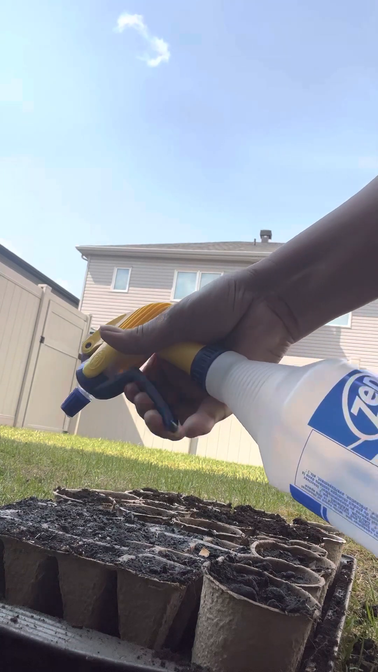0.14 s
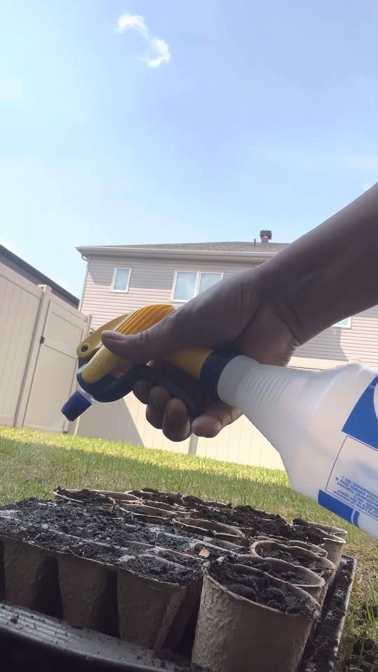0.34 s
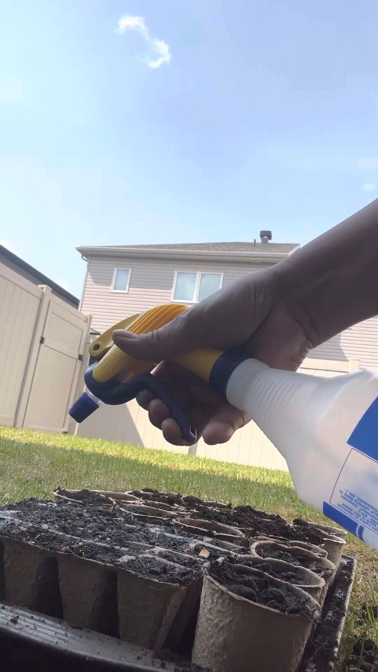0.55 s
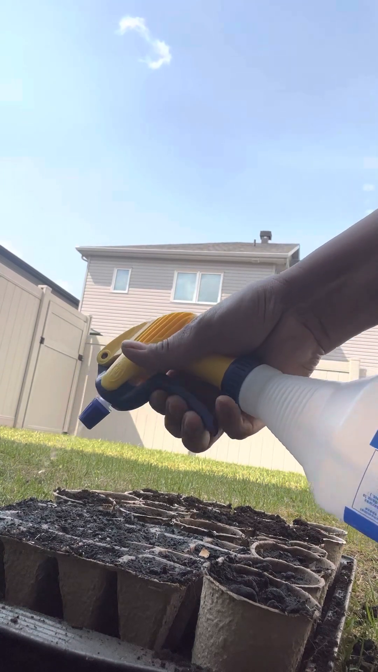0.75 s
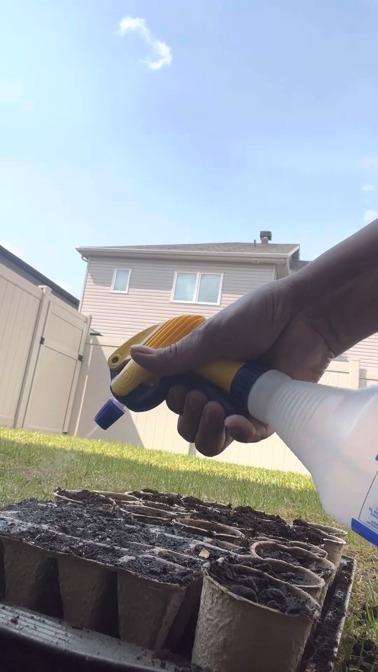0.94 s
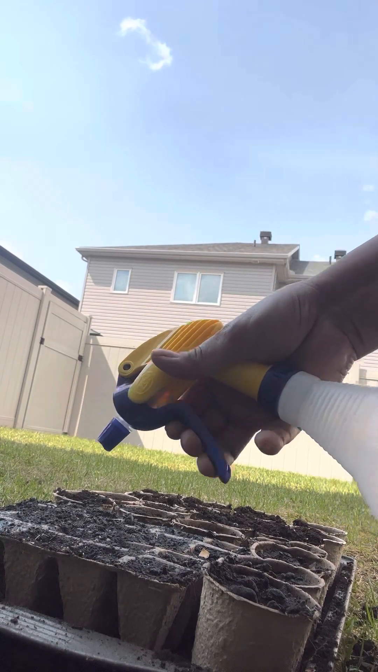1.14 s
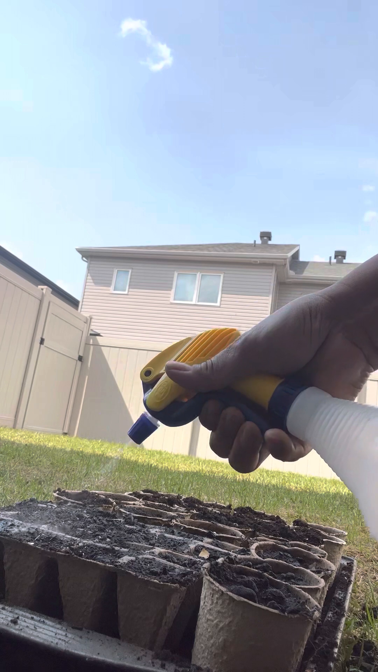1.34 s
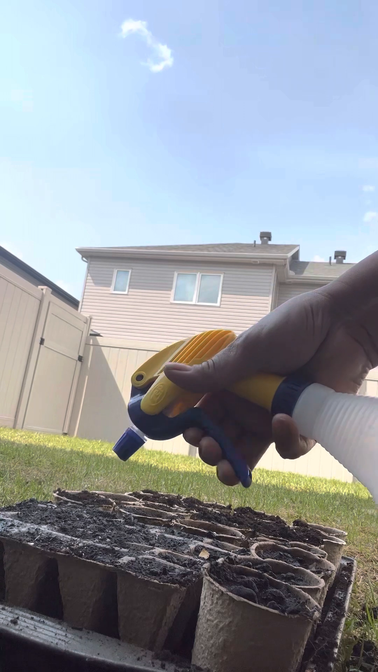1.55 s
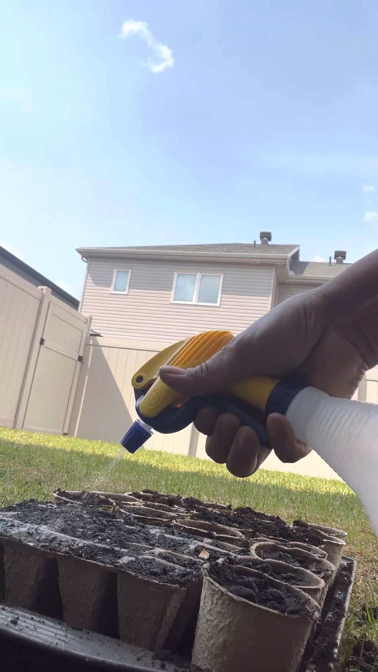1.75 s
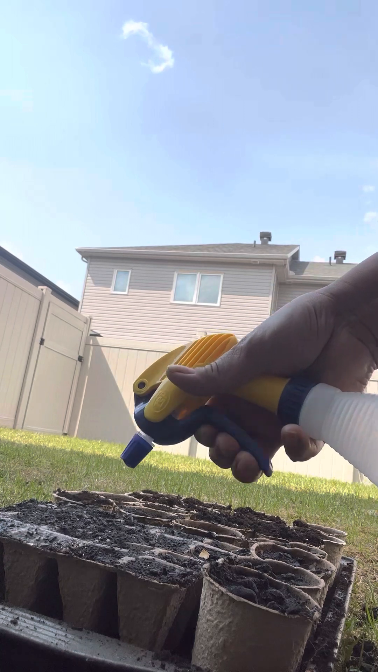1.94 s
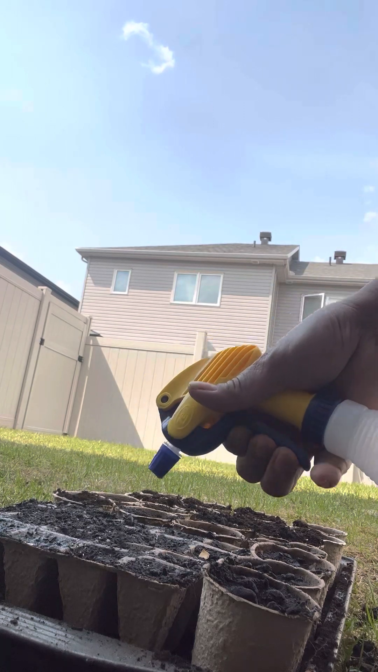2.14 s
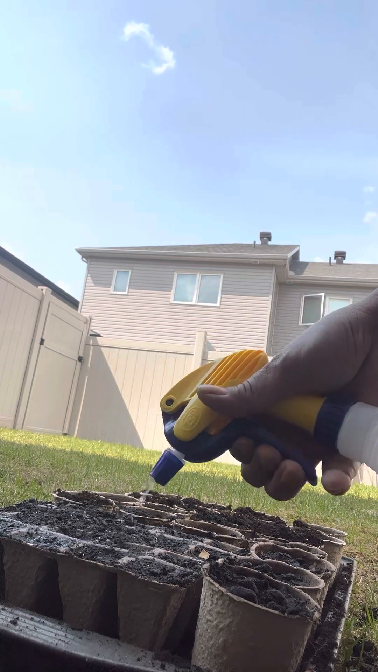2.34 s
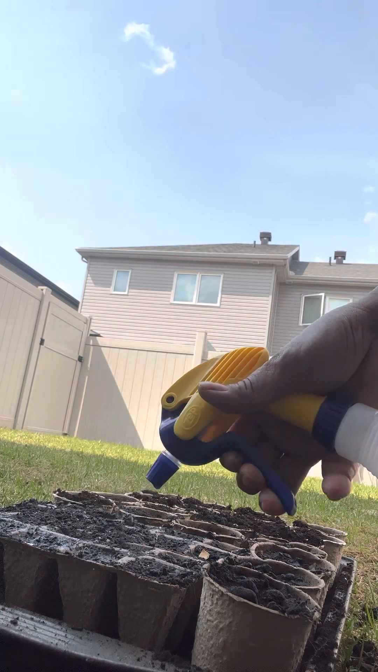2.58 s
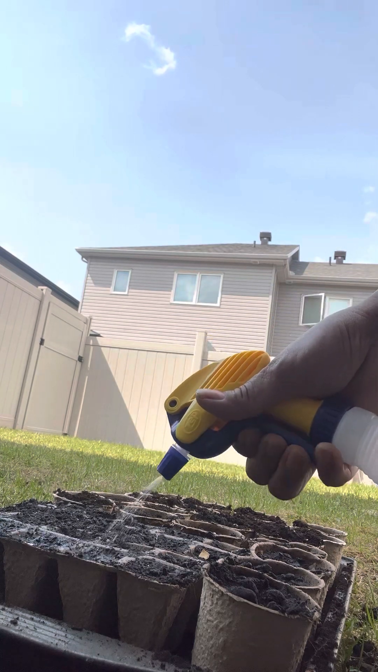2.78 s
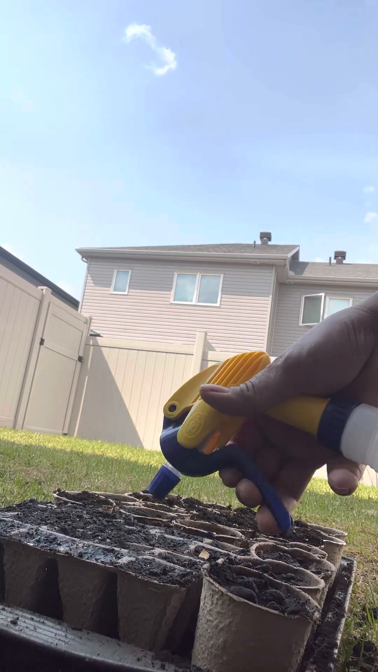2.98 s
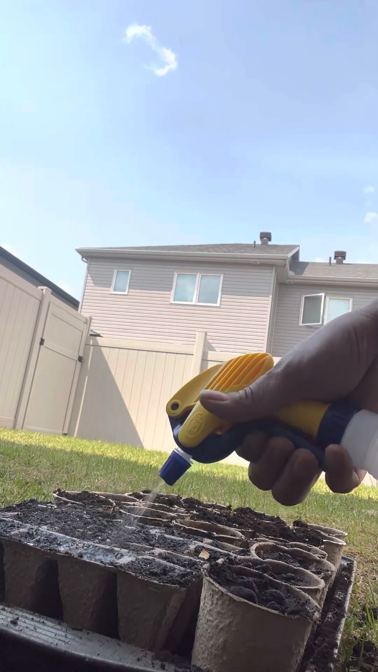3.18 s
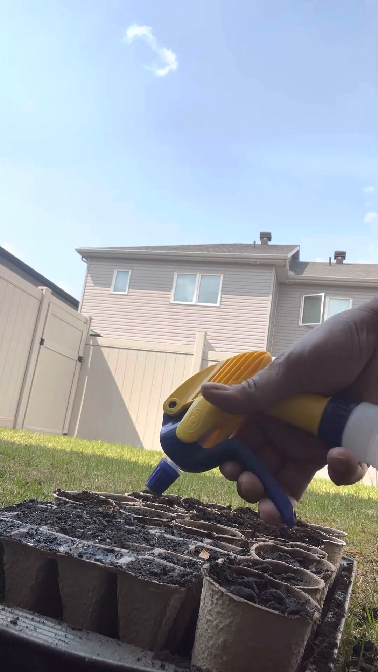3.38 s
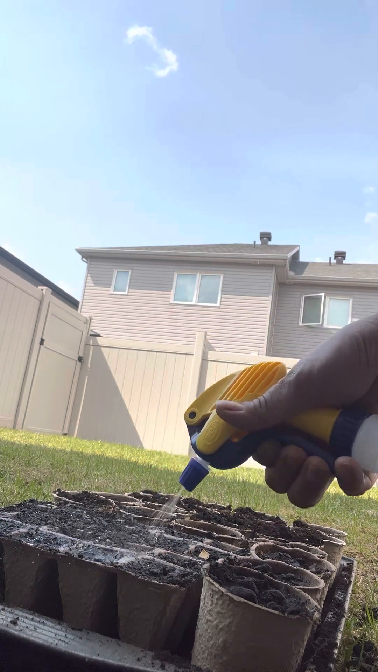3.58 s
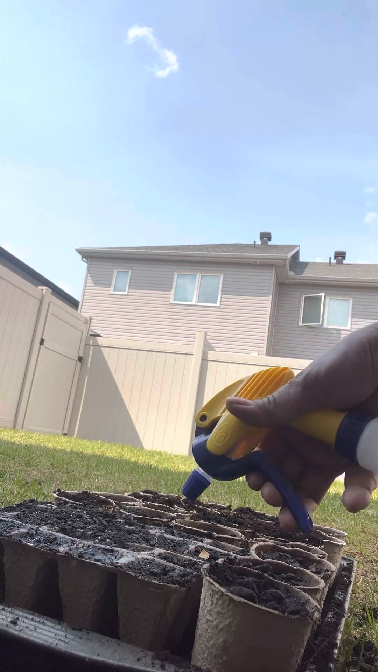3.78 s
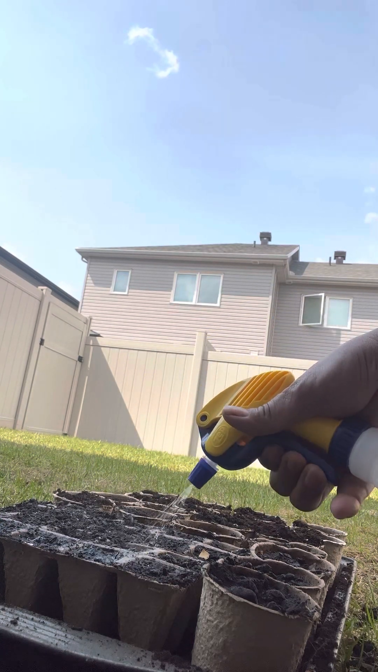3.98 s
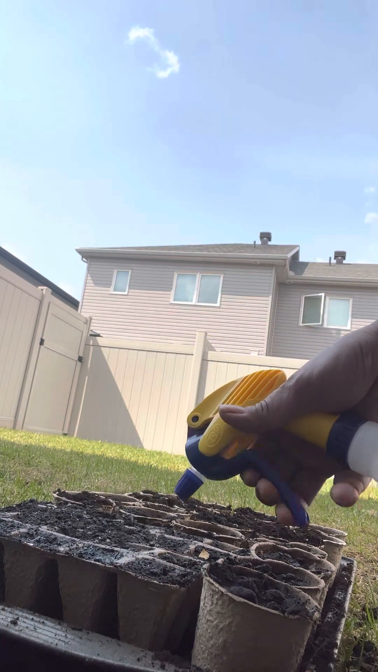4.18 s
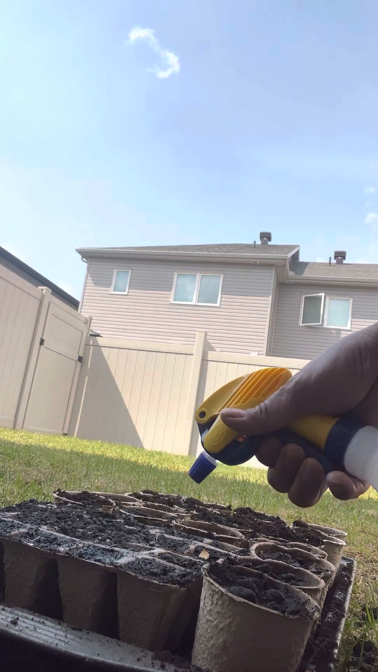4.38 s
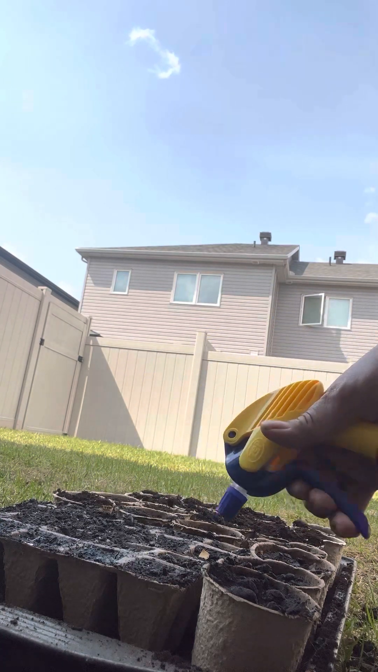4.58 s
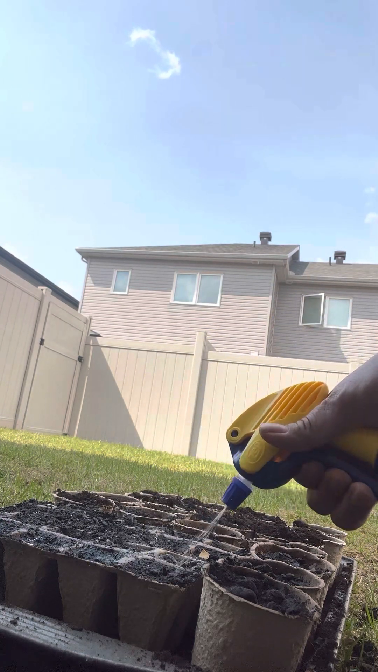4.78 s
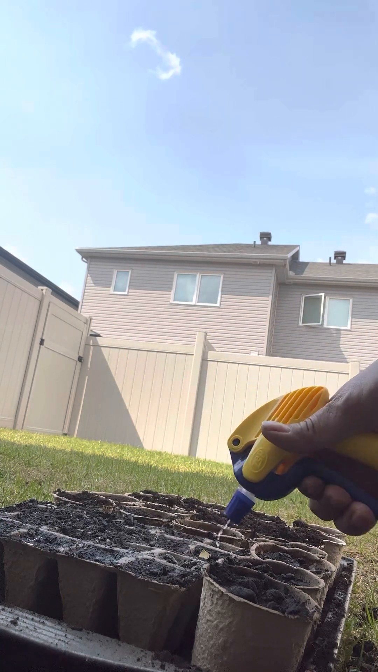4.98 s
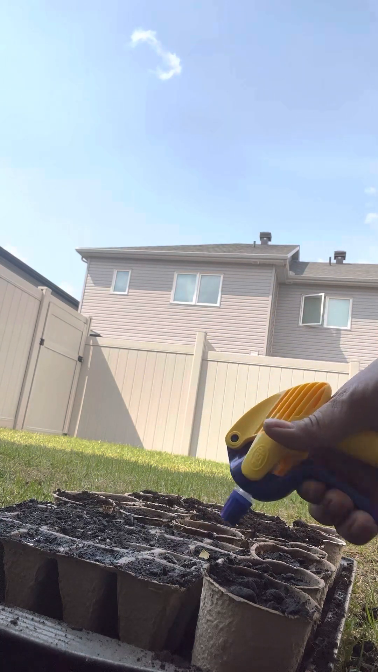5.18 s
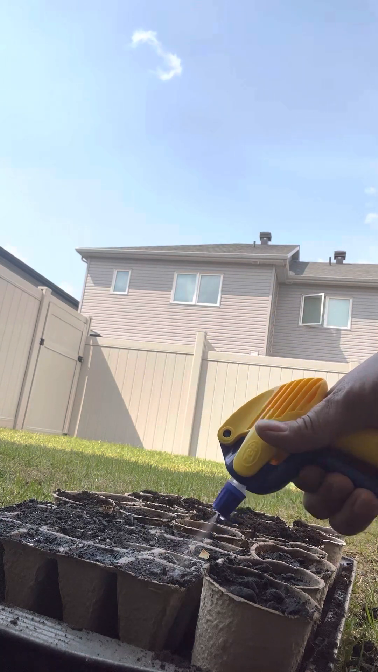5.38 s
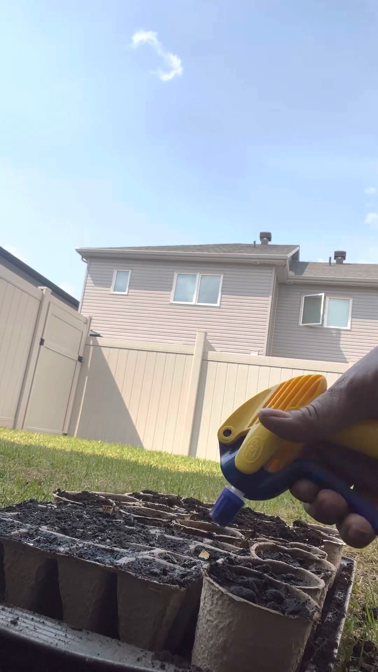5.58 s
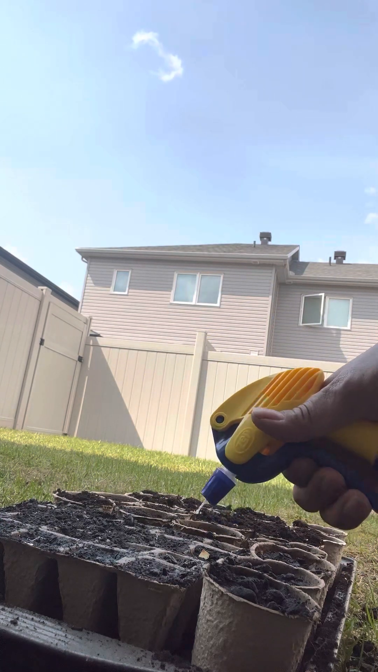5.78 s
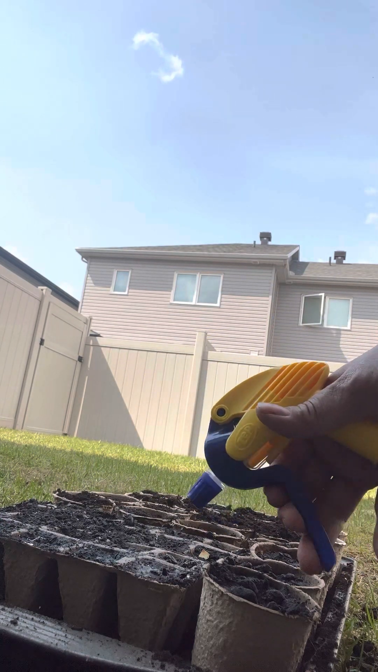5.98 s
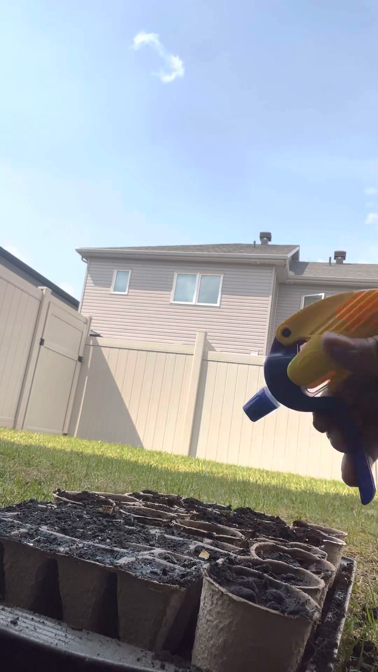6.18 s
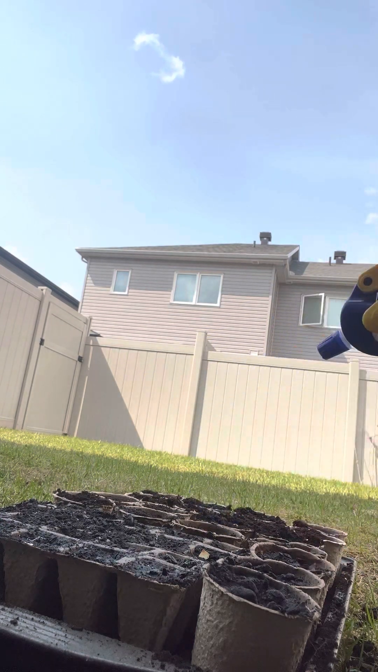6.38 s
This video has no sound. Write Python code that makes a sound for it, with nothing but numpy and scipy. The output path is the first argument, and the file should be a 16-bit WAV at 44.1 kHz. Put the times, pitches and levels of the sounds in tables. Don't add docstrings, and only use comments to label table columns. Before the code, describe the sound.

Close, dry spritzing over peat pots outdoors: crisp hissing spurts in an uneven but steady rhythm, with wheezy pump refills between them. Hollow plastic clicks, brief metallic pings and little rubbery chirps mark some releases. The last squeezes come with a hard low knock, then the spraying stops and leaves a quiet yard hum, faint leaves and soft wind rumble on a handheld phone.

```python
import sys
import numpy as np
from scipy import signal
from scipy.fft import rfft, irfft, next_fast_len
from scipy.io import wavfile
from scipy.ndimage import uniform_filter1d, map_coordinates

SR = 44100
rng = np.random.default_rng(int(sys.argv[2]) if len(sys.argv) > 2 else 0)


def to_linear_factor(level_db):
    exponent = np.asarray(level_db, float) / 20
    return 10 ** exponent


def transcribe(u):
    v = np.clip(np.atleast_2d(u).T, -1, 1)
    q = np.round(v * 32767).astype(np.int16)
    wavfile.write(sys.argv[1], SR, q)


N = 283563

# start in seconds, nozzle hiss in dB, pump body over the hiss
# in dB, rise in seconds, hold in seconds, time to fall 60 dB in seconds.
SPURTS = [(0, -35.5, -3.5, 0.00066, 0.022, 0.064), (0.1357, -53, 9.5, 0.0077, 0, 0.021),
          (0.136, -51.5, 10.5, 0.016, 0.057, 0.12), (0.183, -35.5, -11, 0.0011, 0, 0.04),
          (0.196, -43.5, -1, 0.0068, 0.032, 0.05), (0.2606, -57, 8, 0.0062, 0.006, 0.03),
          (0.316, -47, -7, 0.0096, 0.076, 0.2), (0.35, -44.5, 0, 0.052, 0.078, 0.2),
          (0.408, -34, -9, 0.0033, 0.011, 0.11), (0.483, -36, -5, 0.0048, 0.037, 0.078),
          (0.551, -48, -5, 0.0045, 0.016, 0.082), (0.5776, -51.5, 7.5, 0.009, 0.032, 0.15),
          (0.6896, -43.5, 2, 0.00078, 0, 0.02), (0.734, -61, 12, 0.008, 0.016, 0.012),
          (0.7404, -40.5, -8, 0.008, 0, 0.19), (0.788, -44.5, -2.5, 0.0063, 0.045, 0.121),
          (0.831, -32, -3.5, 0.0079, 0.01, 0.031), (0.84, -36.5, -5.5, 0.048, 0.093, 0.16),
          (1.011, -56, 12.5, 0.013, 0.058, 0.11), (1.1395, -59.5, 5, 0.002, 0, 0.13),
          (1.1448, -29.5, -5.5, 0.0055, 0.00075, 0.016), (1.1927, -58.5, 13, 0.003, 0.0078, 0.027),
          (1.1929, -41.5, -4.5, 0.0066, 0.015, 0.23), (1.2356, -32.5, -7, 0.043, 0.097, 0.091),
          (1.3703, -37.5, -1.5, 0.0074, 0.013, 0.051), (1.4363, -56, 7.5, 0.01, 0.005, 0.034),
          (1.4502, -53, 6.5, 0.015, 0.036, 0.046), (1.51, -78, 7, 0.0071, 0.013, 0.2),
          (1.5426, -44, 0.5, 0.001, 0, 0.028), (1.5937, -48.5, -7, 0.015, 0.054, 0.04),
          (1.656, -43.5, -1, 0.0089, 0.0067, 0.018), (1.6605, -31.5, -5.5, 0.033, 0.02, 0.22),
          (1.827, -47, -10, 0.001, 0.00056, 0.04), (1.8274, -52, 7, 0.01, 0.027, 0.16),
          (1.8967, -41.5, 0, 0.0097, 0.0054, 0.012), (1.963, -34, -3.5, 0.053, 0.029, 0.12),
          (1.966, -57, 8, 0.008, 0.002, 0.03), (1.9835, -38, -1.5, 0.0033, 0.0066, 0.012),
          (2.1755, -51.5, 7, 0.005, 0, 0.049), (2.188, -47.5, 4.5, 0.0075, 0.064, 0.11),
          (2.238, -54, 14.5, 0.004, 0.013, 0.06), (2.3083, -42, 1, 0.0084, 0.0033, 0.029),
          (2.3492, -64, 2, 0.008, 0.0054, 0.012), (2.3628, -41.5, -12, 0.005, 0.0058, 0.03),
          (2.3654, -39, -4, 0.046, 0.055, 0.19), (2.416, -30.5, -6.5, 0.012, 0.0084, 0.082),
          (2.4877, -33, -5, 0.0062, 0.039, 0.032), (2.563, -53.5, 7.5, 0.016, 0.042, 0.1),
          (2.611, -40, 4, 0.001, 0.0015, 0.044), (2.655, -83, 30, 0.0054, 0, 0.045),
          (2.663, -60.5, 10.5, 0.0045, 0, 0.15), (2.6991, -42.5, 3.5, 0.0012, 0.00053, 0.019),
          (2.715, -71.5, 18, 0.0052, 0.0047, 0.018), (2.728, -40.5, -13, 0.0065, 0.0097, 0.09),
          (2.759, -58, -2, 0.0082, 0.071, 0.012), (2.813, -48, -4, 0.037, 0.015, 0.121),
          (2.8743, -36.5, -7, 0.0038, 0.026, 0.054), (2.921, -54.5, 5.5, 0.0093, 0.074, 0.08),
          (3.0385, -50, 4, 0.001, 0.0012, 0.024), (3.081, -43, -9.5, 0.024, 0.017, 0.101),
          (3.083, -78, 31.5, 0.0077, 0, 0.017), (3.1304, -30.5, -5.5, 0.049, 0.03, 0.22),
          (3.2125, -40, -2.5, 0.0056, 0.047, 0.017), (3.3146, -43.5, -18, 0.002, 0.0016, 0.02),
          (3.3278, -43.5, 4, 0.0046, 0, 0.032), (3.329, -50, 5.5, 0.026, 0.025, 0.1),
          (3.429, -65, 4, 0.008, 0.013, 0.101), (3.4376, -32.5, 1.5, 0.00081, 0, 0.028),
          (3.4765, -44, -3.5, 0.0095, 0.0086, 0.12), (3.5126, -38.5, -4, 0.054, 0.055, 0.21),
          (3.544, -35.5, -6, 0.008, 0.048, 0.018), (3.6465, -37, -4.5, 0.0034, 0.013, 0.058),
          (3.695, -52.5, 8, 0.015, 0.038, 0.12), (3.806, -48.5, 7, 0.0016, 0, 0.02),
          (3.8493, -70, 25, 0.001, 0, 0.021), (3.852, -47.5, -8.5, 0.008, 0.019, 0.16),
          (3.891, -30, -7, 0.045, 0.018, 0.18), (4.0162, -35.5, -8.5, 0.005, 0.019, 0.14),
          (4.0801, -60.5, 13.5, 0.007, 0, 0.19), (4.133, -55.5, 2, 0.001, 0.00055, 0.04),
          (4.1694, -57, 7.5, 0.002, 0, 0.021), (4.238, -75.5, 20, 0.0057, 0.018, 0.012),
          (4.244, -32.5, -4, 0.049, 0.054, 0.079), (4.2613, -31, -6, 0.00078, 0, 0.025),
          (4.4484, -51.5, 6.5, 0.0089, 0.048, 0.11), (4.5762, -59, 7, 0.0075, 0.0051, 0.027),
          (4.618, -64.5, 17, 0.0068, 0.0015, 0.018), (4.632, -44.5, -8, 0.0024, 0.0063, 0.11),
          (4.6644, -49.5, -1.5, 0.007, 0.0026, 0.2), (4.669, -31, -8.5, 0.036, 0.01, 0.17),
          (4.689, -31, -5.5, 0.0053, 0, 0.022), (4.76, -37, -6, 0.009, 0.047, 0.051),
          (4.848, -53, 7.5, 0.004, 0.0084, 0.13), (4.9232, -51, 0, 0.0022, 0, 0.017),
          (4.979, -32, -5, 0.05, 0.047, 0.094), (5.1802, -50.5, 6, 0.0048, 0, 0.22),
          (5.288, -54.5, 3, 0.002, 0, 0.033), (5.295, -27.5, -3, 0.0038, 0, 0.018),
          (5.3415, -34, -1.5, 0.036, 0.038, 0.072), (5.352, -34.5, -8, 0.005, 0.024, 0.081),
          (5.4875, -53.5, 11.5, 0.0014, 0, 0.028), (5.563, -50.5, 8, 0.015, 0.054, 0.13),
          (5.6576, -74.5, 16, 0.008, 0.029, 0.19), (5.7234, -45, 2, 0.002, 0, 0.02),
          (5.735, -65.5, 19.5, 0.007, 0, 0.123), (5.78, -48.5, -11, 0.018, 0.033, 0.14),
          (5.9405, -53.5, 5, 0.0045, 0.022, 0.081), (5.969, -55, 7.5, 0.004, 0.0053, 0.15)]
# frequency in Hz, level in dB per Hz.
HISS_SPECTRUM = [(5000, -67), (7000, -2), (9000, -6), (11000, -6), (12800, 2.5), (15000, 2.5), (15800, -3),
                 (16300, -40), (17000, -36)]
# frequency in Hz, level in dB per Hz.
BODY_SPECTRUM = [(150, -40), (300, -13), (600, -9.5), (1000, -11.5), (1500, -13), (2300, -8), (3300, -3.5),
                 (4800, -7), (7000, -1.5), (9000, -10.5), (12000, -49.5)]
# centre in Hz, width in Hz, level in dB.
CHAMBER_MODES = [(2140, 330, -11), (3430, 885, 1.5), (4400, 750, -4), (5810, 750, 2)]
# start in seconds, peak in dB, pitch in Hz, 60 dB decay in seconds.
KNOCKS = [
    (0.185, -27.5, 569, 0.043),
    (1.15, -38, 530, 0.055),
    (2.211, -37, 597, 0.05),
    (3.44, -40, 587, 0.05),
    (5.297, -52, 550, 0.05),
    (5.49, -24, 467, 0.028),
    (5.946, -43, 624, 0.042),
]
# start in seconds, pitch in Hz, level in dB, 60 dB decay in seconds.
PINGS = [(.222, 2467, -32, 0.13), (2.248, 4050, -34, 0.11), (2.25, 6083, -36, 0.067),
         (3.001, 4070, -52, 0.13), (4.5, 4350, -36, .05), (4.89, 4070, -57, 0.12), (5.618, 4115, -40, 0.11),
         (5.62, 6745, -44, .06), (5.745, 4075, -43, .14), (5.975, 4300, -42.5, 0.065),
         (5.975, 7050, -51, 0.072)]
# start in seconds, pitch in Hz, width in Hz, level in dB, length in seconds.
SQUEAKS = [
    (.215, 2460, 90, -43, 0.042),
    (2.22, 4550, 200, -43, .025),
    (2.242, 4400, 450, -38, 0.024),
    (2.605, 4500, 301, -48.5, .02),
    (5.607, 4150, 300, -41, 0.02),
    (5.737, 3550, 453, -39, 0.012),
]
# frequency in Hz, lead of the left port in radians.
PORT_LEAD = [(1000, 0), (2000, -.9), (3600, 0), (5500, 1.1), (7500, 2.4), (8600, 2.9), (10000, 3.4),
             (11300, 4.6), (12600, 5.8), (14000, 6.2), (16000, 6.5)]
# frequency in Hz, level in dB.
POT_ECHOES = [(200, -5), (1000, -1), (2500, 0), (4500, -5.5), (8000, -14.5), (12000, -12), (16000, -16)]
# time in seconds, wind buffet in dB, far hum in dB, leaves in dB.
AIR_LEVELS = [(0.0, -46, -51.5, -64), (0.11, -46, -58, -66.5), (0.29, -55, -57.5, -71),
              (0.43, -50, -57, -65), (0.48, -40.5, -64, -68.5), (0.59, -42.5, -55, -65),
              (0.62, -49, -56.5, -63), (0.72, -35, -59.5, -64), (0.84, -47, -57, -62),
              (0.97, -32.5, -55, -69), (1.05, -54, -56, -66.5), (1.56, -69.5, -69, -68.5),
              (2.04, -55, -65.5, -70), (2.17, -59, -61, -70), (2.27, -53, -57.5, -65),
              (2.38, -58, -59.5, -65), (2.42, -53.5, -58.5, -71), (2.78, -53, -56, -62),
              (2.83, -57, -58.5, -67), (2.9, -47.5, -57.5, -65), (3.04, -58, -57.5, -68),
              (3.22, -51.5, -58, -73), (3.56, -58.5, -58, -64), (3.65, -37, -51, -62),
              (3.81, -53, -59.5, -70), (4.35, -55, -57.5, -70.5), (4.6, -56, -59, -67.5),
              (4.67, -60, -56, -63), (4.8, -51.5, -56, -67), (4.99, -58.5, -57, -72),
              (5.1, -40.5, -55, -70.5), (5.43, -48, -65, -67.5), (5.46, -49, -57.5, -70),
              (6.09, -52.5, -62, -70.5), (6.14, -55.5, -63.5, -79), (6.36, -48, -64, -70.5),
              (6.43, -56, -63.5, -74)]
# frequency in Hz, level in dB per Hz.
BUFFET_SPECTRUM = [(15, -59), (28, -23.5), (45, -4), (65, -2.5), (90, -2.5), (115, -6), (150, -19),
                   (300, -31.5), (600, -73)]
# start in seconds, level in dB, 60 dB decay in seconds.
SLAPS = [
    (.93, -48, .25),
    (3.624, -33.5, 0.31),
    (5.09, -46.5, 0.28),
]
# frequency in Hz, level in dB per Hz.
SLAP_SPECTRUM = [(30, -29), (60, 3), (120, -9), (300, -14), (600, -34), (1000, -59)]
# frequency in Hz, level in dB per Hz.
HUM_SPECTRUM = [(70, -37), (130, -3), (200, -3), (330, -4), (600, -5), (820, -10), (1000, -17),
                (1500, -24.5), (2500, -62)]
# frequency in Hz, level in dB per Hz.
LEAVES_SPECTRUM = [(700, -42), (1200, -6), (2000, 1.5), (2800, -4.5), (4000, -4.5), (7000, -11.5),
                   (8500, -22), (11000, -24), (13200, -8.5), (15800, -16.5), (16400, -52.5)]
# frequency in Hz, side over mid in dB.
FAR_SIDE = [(100, -23.5), (250, -11), (600, -6.5), (1300, 3.5), (4400, 0.5), (8500, 11), (11000, 9),
            (13500, -13)]


def unit(x):
    return x / np.sqrt(np.mean(x ** 2) + 1e-20)


def along(points, hz):
    f, value = np.transpose(points)
    return np.interp(np.log(hz + 1), np.log(f + 1), value)


def wobble(rate):
    knots = rng.standard_normal(int(N * rate / SR) + 4)
    return map_coordinates(knots, [np.arange(N) * rate / SR])


def filtered(x, response):
    m = next_fast_len(N + 8192)
    return irfft(rfft(x, m) * response(np.fft.rfftfreq(m, 1 / SR)), m)[..., :N]


def noise(spectrum, channels=1, patchy_db=0.):
    z = signal.stft(rng.standard_normal((channels, N)), nperseg=256)[2]
    patches = uniform_filter1d(rng.standard_normal(z.shape[1:]), size=4, axis=0)
    patches = uniform_filter1d(patches, size=8, axis=1)
    x = signal.istft(z * to_linear_factor(patchy_db * unit(patches)), nperseg=256)[1][:, :N]
    return unit(filtered(x, lambda hz: to_linear_factor(along(spectrum, hz))))


def flow():
    power = np.zeros((2, N + SR))
    u = np.arange(SR // 3) / SR
    for s, db, body_db, rise, hold, t60 in SPURTS:
        opening = np.clip(u / max(rise, .0005), 0, 1) ** 2
        closing = to_linear_factor(-60 * np.clip(u - rise - hold, 0, None) / max(t60, .008))
        start = round(s * SR)
        power[:, start:start + len(u)] += (to_linear_factor([[db], [db + body_db]]) * opening * closing) ** 2
    hiss, body = np.sqrt(power[:, :N])
    sputter = to_linear_factor(1.5 * wobble(60) + 2.34 * wobble(150) + 2.2 * wobble(600))
    hiss = hiss * unit(sputter * to_linear_factor(1.4 * wobble(250)))
    body = body * unit(sputter ** 0.76 * to_linear_factor(1.64 * wobble(120)))
    return hiss, body


def chamber(hz):
    response = 0.49
    for k, (centre, width, db) in enumerate(CHAMBER_MODES):
        damping = 1j * hz * width
        response = response + (-1) ** k * to_linear_factor(db) * damping / (centre * centre - hz * hz + damping)
    return response


def spray():
    hiss, body = flow()
    rush = unit(filtered(noise(BODY_SPECTRUM, patchy_db=3)[0], chamber))
    return to_linear_factor(3.0) * hiss * noise(HISS_SPECTRUM, patchy_db=2.5)[0] + to_linear_factor(1.9) * body * rush


def trigger():
    out = np.zeros(N + SR)
    u = np.arange(SR // 3) / SR
    for s, db, hz, t60 in KNOCKS:
        phase = 2 * np.pi * hz * u
        ring = np.sin(phase)
        ring += 0.68 * to_linear_factor(-60 * u / 0.027) * np.sin(1.65 * phase)
        ring += 0.47 * to_linear_factor(-60 * u / 0.017) * np.sin(2.57 * phase)
        out[round(s * SR):][:len(u)] += to_linear_factor(db - 60 * u / t60) * (1 - np.exp(-u / 0.0011)) * ring
    for s, hz, db, t60 in PINGS:
        ring = np.sin(2 * np.pi * hz * u)
        out[round(s * SR):][:len(u)] += to_linear_factor(db - 60 * u / t60) * (1 - np.exp(-u / 0.001)) * ring
    return out[:N]


def squeaks():
    out = np.zeros(N + SR)
    u = np.arange(SR // 8) / SR
    for s, hz, width, db, length in SQUEAKS:
        slips = uniform_filter1d(rng.standard_normal((2, len(u))), size=int(SR / width), axis=1)
        phase = 2 * np.pi * hz * u
        tone = unit(slips[0] * np.sin(phase) + slips[1] * np.cos(phase))
        fade = to_linear_factor(db - 60 * np.clip(u - length, 0, None) / 0.035)
        out[round(s * SR):][:len(u)] += fade * np.clip(u / .004, 0, 1) * tone
    return out[:N]


def ports(x):
    halves = np.array([[1], [-1]])
    direct = filtered(x, lambda hz: np.exp(.5j * along(PORT_LEAD, hz) * halves))
    u = np.arange(SR // 20) / SR
    tail = rng.standard_normal((2, len(u))) * to_linear_factor(-60 * u / 0.042)
    echoes = signal.fftconvolve(x[None], tail / np.linalg.norm(tail[0]), axes=1)[:, :N]
    return direct + filtered(echoes, lambda hz: to_linear_factor(along(POT_ECHOES, hz)))


def wind():
    t = np.arange(N) / SR
    s, buffet_db, _, _ = np.transpose(AIR_LEVELS)
    buffet = noise(BUFFET_SPECTRUM, channels=2) * unit(to_linear_factor(1.8 * wobble(13)))
    buffet[1] = filtered(buffet[1], lambda hz: to_linear_factor(along([(30, -20), (90, -18.5), (200, -5.5)], hz)))
    slap = np.zeros(N)
    for start, db, t60 in SLAPS:
        since = t - start
        slap += to_linear_factor(db - 60 * np.clip(since, 0, None) / t60) * np.clip(since / .008, 0, 1)
    gusts = slap * noise(SLAP_SPECTRUM, channels=2) * to_linear_factor([[0], [-6]])
    return to_linear_factor(np.interp(t, s, buffet_db)) * buffet + gusts


def neighbourhood():
    t = np.arange(N) / SR
    s, _, hum_db, leaves_db = np.transpose(AIR_LEVELS)
    hum = noise(HUM_SPECTRUM, channels=2) * to_linear_factor(np.interp(t, s, hum_db) + 1.5)
    leaves = noise(LEAVES_SPECTRUM, channels=2, patchy_db=4.0) * to_linear_factor(np.interp(t, s, leaves_db))
    far = hum + leaves
    far[1] = filtered(far[1], lambda hz: to_linear_factor(along(FAR_SIDE, hz)))
    return far


def scene():
    mid, side = wind() + neighbourhood()
    return ports(spray() + trigger() + squeaks()) + np.array([mid + side, mid - side])


def joint_stereo(x, under_db, starve_db, attack_db):
    _, _, z = signal.stft(np.array([x[0] + x[1], x[0] - x[1]]) / 2, SR, nperseg=2048)
    bands = (np.abs(z[:, :-1]) ** 2).reshape(2, 32, 32, -1).mean(axis=2)
    leeway = to_linear_factor(5 * rng.standard_normal(bands.shape[2]))
    near_twin = bands > bands[::-1] * to_linear_factor(2 * under_db) * leeway
    near_peak = bands > bands[:, 4:].max(axis=(0, 1)) * to_linear_factor(2 * starve_db)
    keep = near_twin & near_peak
    treble = bands[:, 4:].sum(axis=(0, 1))
    keep[..., 1:] |= treble[1:] > treble[:-1] * to_linear_factor(2 * attack_db)
    keep[:, :5] = True
    z[:, :-1] *= np.repeat(keep, 32, axis=1)
    mid, side = signal.istft(z, SR, nperseg=2048)[1][:, :N]
    return np.array([mid + side, mid - side])


def low_pass(x):
    return signal.sosfilt(signal.butter(12, 16970, fs=SR, output="sos"), x)


def record(dry):
    limited = filtered(dry, lambda hz: hz < 16900)
    mix = joint_stereo(limited, under_db=-10, starve_db=-24, attack_db=7)
    return low_pass(mix)


dry = scene()
out = record(dry)
transcribe(out)
```